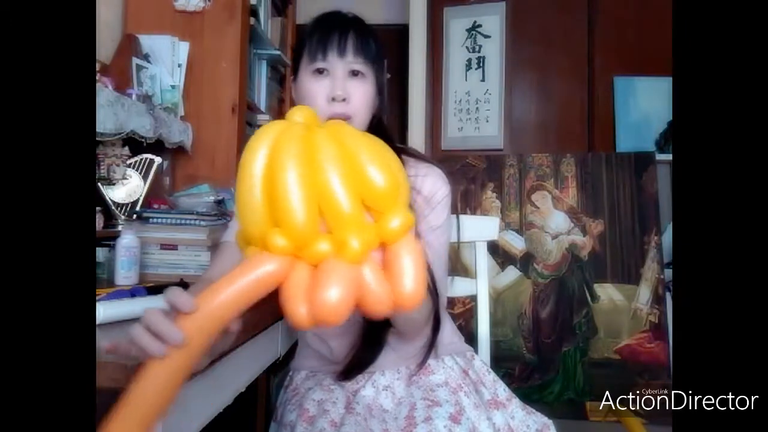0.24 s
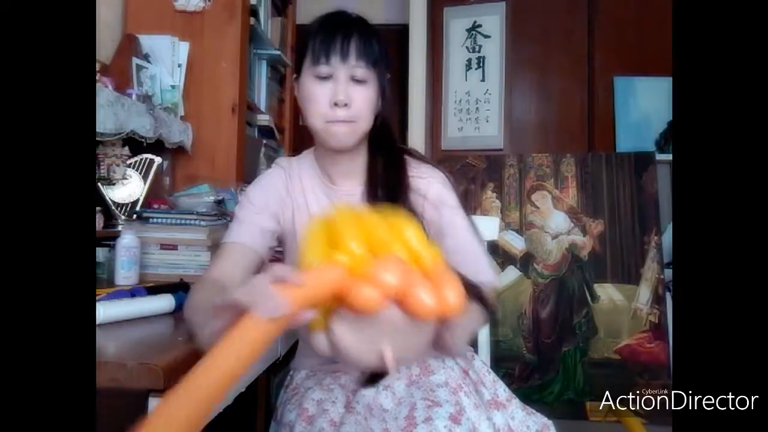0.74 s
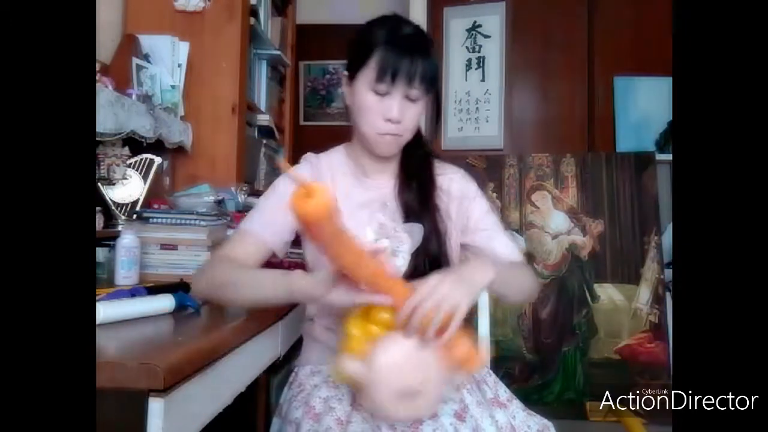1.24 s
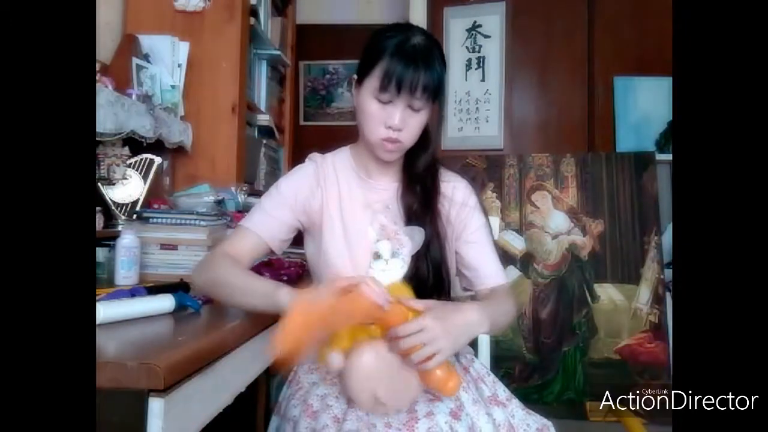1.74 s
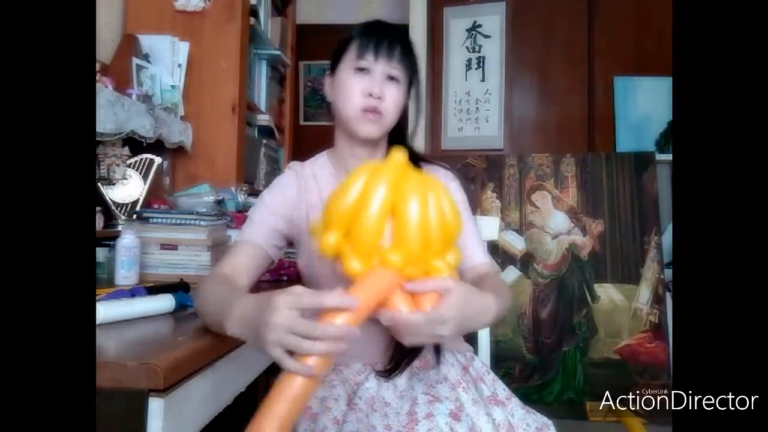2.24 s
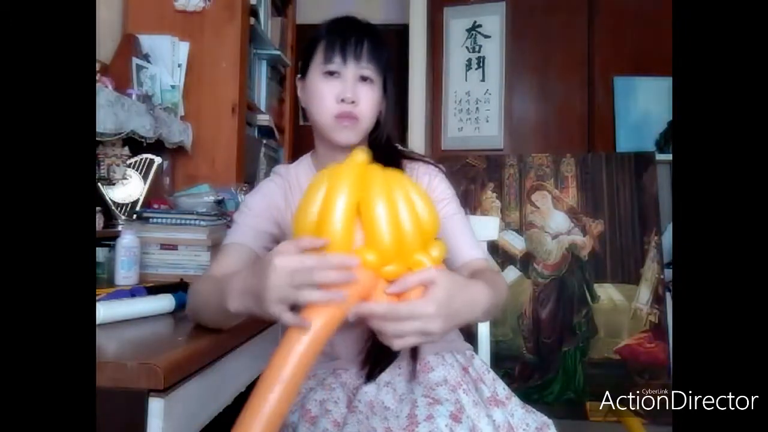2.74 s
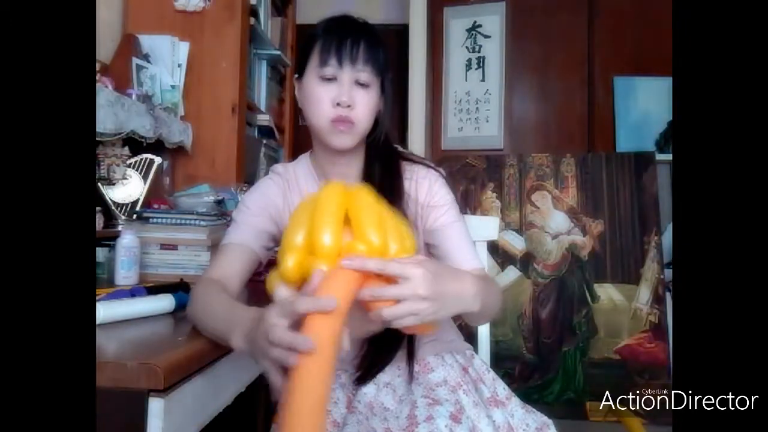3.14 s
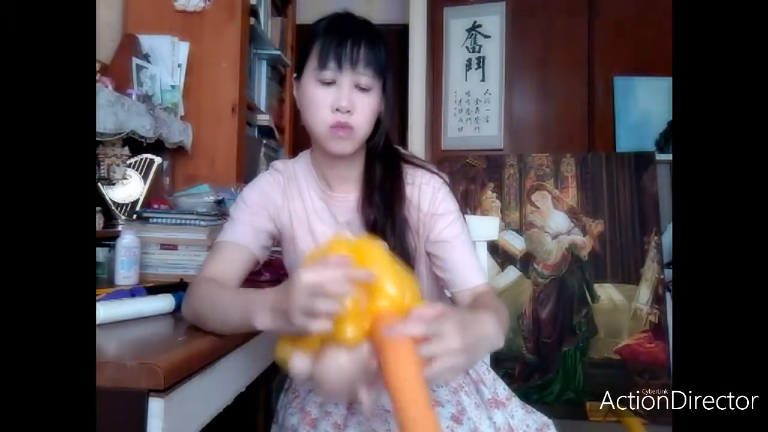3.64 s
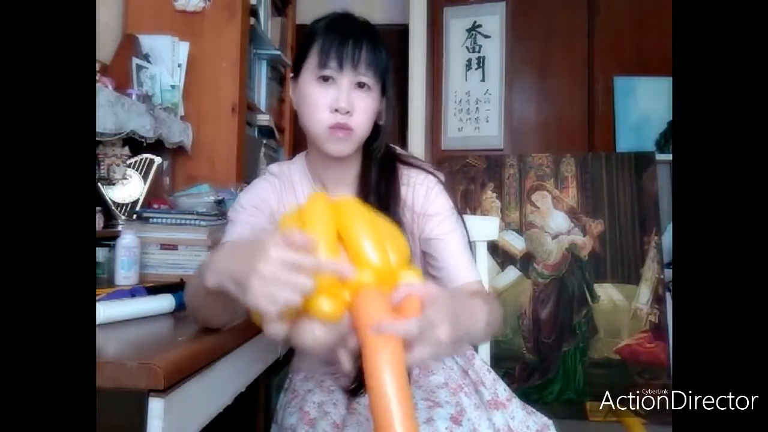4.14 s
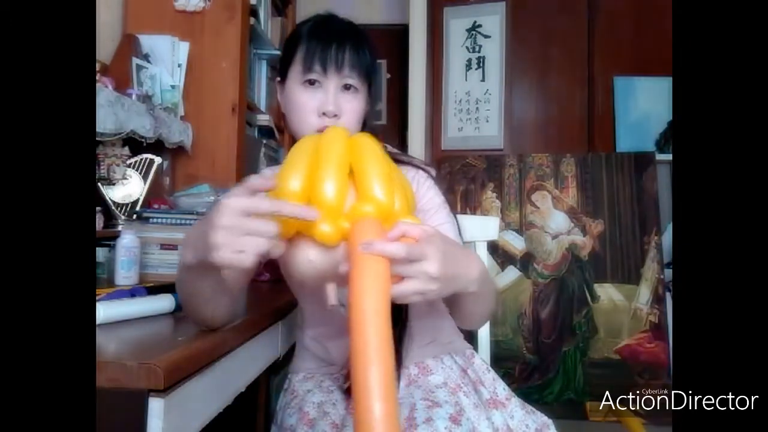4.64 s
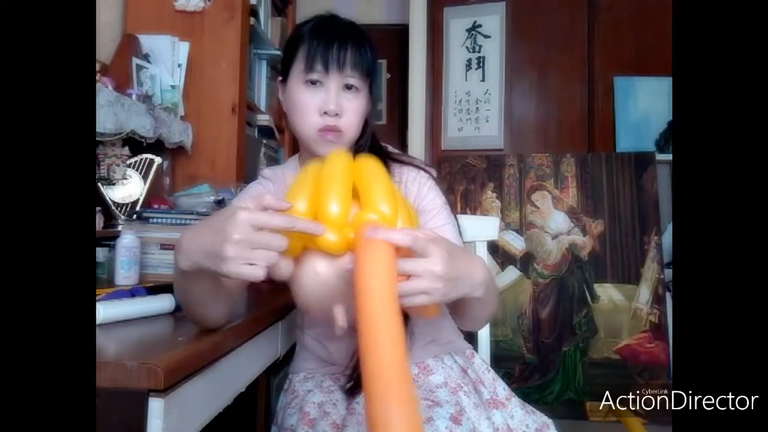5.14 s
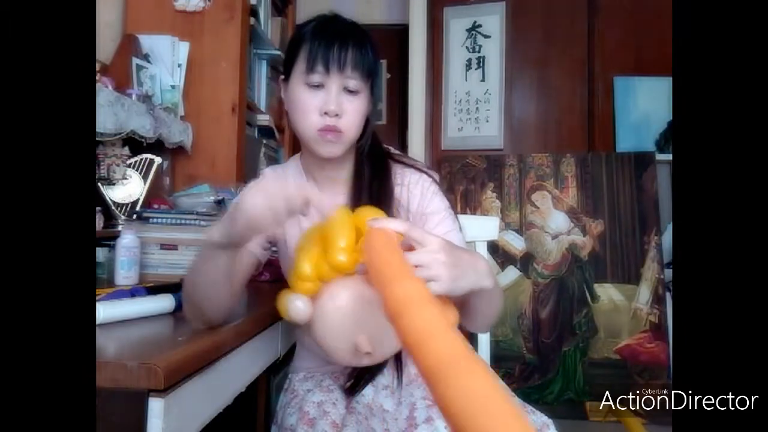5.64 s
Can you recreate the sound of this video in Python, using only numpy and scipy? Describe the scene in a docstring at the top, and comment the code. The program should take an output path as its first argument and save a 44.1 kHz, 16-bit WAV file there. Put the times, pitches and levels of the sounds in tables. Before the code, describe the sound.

In a small room with a steady low hum, hands work a bundle of blown-up modelling balloons. The rubber sticks and slips in scattered ticks, creaks and brief squeaks with a hollow ring, while fingers brush over the skin and the bundle thumps dully. The handling starts gently, builds to a cluster of sharper squeaks and snaps, then pauses before one last clear snap. A single small microphone picks it all up.

```python
"""A small room, where blown-up latex modelling balloons are twisted and woven together by hand.
The rubber skins stick, then slip: one slip snaps, a quick run of slips creaks or squeaks,
and lightly sliding fingers hiss. Every slip makes the balloons ring. The bundle thumps softly
against hands and lap, and one small microphone hears it all over a low hum."""
import sys
import numpy as np
from scipy import signal
from scipy.fft import rfft, irfft
from scipy.io import wavfile
from scipy.ndimage import uniform_filter1d

SR = 44100
rng = np.random.default_rng(int(sys.argv[2]) if len(sys.argv) > 2 else 0)


def master_out(mix):
    """Clip the mix to full scale and print it as 16-bit PCM to the path in sys.argv[1]."""
    frames = np.transpose(np.atleast_2d(mix))
    ceiling = np.clip(frames, -1, 1)
    pcm = np.round(ceiling * 32767).astype(np.int16)
    wavfile.write(sys.argv[1], SR, pcm)


N = 260190
TIME = np.arange(N) / SR

# The skin breaks loose, then drags on:
# (time [s], level [dB], bass [dB], treble [dB], note of the pinched skin [Hz], drag length [s])
SKIN_SNAPS = [(0.625, -54, -4, 3, 3900, .025), (0.776, -55.5, -4, 1, 3900, 0.091),
              (1.443, -51.5, -7, 5, 2570, 0.12), (1.664, -46, 6, 3.5, 1570, 0.081),
              (1.740, -55.5, 7, 15, 610, 0.022), (1.879, -50.5, -10, 10, 3680, .03),
              (2.202, -49.5, -10, -5, 960, 0.012), (2.252, -59, -3, -1, 580, .01),
              (2.476, -63.5, 3, -1, 6990, 0.0088), (2.523, -63.5, 2, 2, 3560, .005),
              (2.558, -55, 1, 4, 1630, .015), (2.821, -51, 7.5, 9, 1590, 0.042),
              (2.890, -56.5, 7, 8, 2380, 0.026), (3.231, -54.5, -10, 14, 2780, 0.013),
              (3.590, -45, 3.5, -1, 1520, 0.063), (3.732, -55.5, -9, -17, 2260, 0.008),
              (3.844, -48.5, 1, -0.5, 2250, 0.016), (3.943, -49, -1, -0.5, 4200, .015),
              (3.976, -45.5, 3, 3, 2070, 0.0048), (4.006, -36.5, -0.5, 0, 670, 0.0082),
              (4.114, -34.5, -2, 7, 4200, 0.024), (4.139, -40.5, -1, -2, 673, 0.057),
              (4.298, -41, 5.5, -2, 1300, 0.074), (4.415, -45.5, -6, -3.5, 1190, 0.0125),
              (4.479, -51.5, 4, -3, 4340, 0.0076), (4.550, -48.5, 1.5, 0, 6460, .03),
              (4.687, -40.5, -4.5, -5.5, 1120, 0.015), (4.74, -41, -4, -3, 1330, 0.025),
              (5.229, -48.5, -3.5, -5.5, 1060, 0.021), (5.248, -46, -3.5, -5.5, 1330, 0.046),
              (5.322, -45.5, 0.5, 3.5, 5980, 0.0075), (5.532, -50, -26, -4, 1400, 0.015),
              (5.547, -33.5, -14.5, -1.5, 915, 0.02)]
# Twists that squeak or creak: (time [s], length [s], slip rate [Hz], unevenness [0-1],
# level [dB], bass [dB], treble [dB], note of the pinched skin [Hz])
TWISTS = [(1.393, 0.05, 902, 0.56, -65.5, -9, 8, 2390), (1.691, .09, 627.6, 0.11, -60, 11, -1, 638),
          (1.855, 0.047, 700, 0.58, -59.5, 1, 23, 4000), (2.685, 0.033, 902, 0.21, -52, -11, 9, 6960),
          (2.733, 0.026, 907, 0.31, -53, 7, 10, 3600), (2.819, .018, 347.5, .05, -55, 17, -1, 340),
          (3.109, 0.075, 904, 0.51, -60.5, -30, 6, 4200), (3.270, 0.088, 449, 0.49, -56.5, -10, -5.5, 2330),
          (3.355, 0.062, 558, 0.18, -42, -6, -5, 4900), (3.415, 0.058, 450, 0.51, -51.5, 1, 0, 3120),
          (3.445, 0.058, 378.2, 0.1, -44.5, -0.5, -5, 750), (4.184, .085, 140.8, 0.04, -36, 1.5, -1.5, 915),
          (4.226, 0.042, 404.7, .15, -45, 5.5, 3, 417), (4.446, 0.02, 800, 0.06, -48.5, -4, 2, 2450),
          (4.643, 0.032, 646.4, 0.02, -41, 0.5, 0.5, 1400), (5.857, 0.065, 497, 0.3, -61.5, 2, -5, 3440)]
# Notes at which the air in the balloons rings: (pitch [Hz], strength [dB], time to fade by 60 dB [s])
AIR_NOTES = [(248.5, -7, 0.48), (349.7, 5.5, 0.11), (417.5, -3.5, 0.29), (577, -1.5, 0.37), (878, -3, 0.28),
             (1009, 3, 0.22), (1376, 0.5, 0.19), (1571, 2.5, 0.14), (1700, -7, 0.25), (1922, -11, 0.25),
             (2324, 2, 0.14), (2500, -11, 0.055), (3440, 4, 0.062), (4665, -1.5, 0.2)]
# Tone of a slip: (frequency [Hz], boost or cut [dB])
SLIP_TONE = [(60, -13), (150, -26.5), (300, -0.5), (550, 2), (1000, -1), (1700, -1), (3000, -2),
             (5300, -5.5), (6200, -3.5), (6900, 0), (7500, -14), (8600, -23.5), (10500, -28), (15000, -29)]
# Fingers glide to a new grip: (start [s], end [s], level [dB])
FINGER_GLIDES = [(0.773, 0.95, -70), (1.346, 1.72, -69.5), (1.79, 2.0, -60), (2.107, 2.26, -60.5),
                 (2.45, 3.04, -66.5), (3.072, 3.538, -62), (3.903, 4.48, -61.5), (4.59, 4.707, -65)]
# Tone of light sliding: (frequency [Hz], boost or cut [dB])
GLIDE_TONE = [(200, -4), (600, 2), (1200, -5), (2300, 0.5), (3400, -1), (4300, -1.5), (5600, -2.5),
              (6900, 4), (7700, -6), (9000, -17), (15000, -14.5)]
# The bundle bumps against hands and lap: (time [s], hollow knock [dB], deep rumble [dB])
BUNDLE_BUMPS = [(.21, -67, -55.5), (.85, -67, -70), (1.182, -57.5, -59), (1.32, -61, -64), (1.57, -60, -72),
                (1.79, -69.5, -61), (2.92, -68, -58), (3.11, -57.5, -64), (3.451, -73, -63),
                (3.99, -52, -67), (4.18, -52, -68), (4.47, -66, -58), (4.75, -55.5, -72), (4.88, -61, -81)]
# Tone of a soft knock on the bundle: (frequency [Hz], boost or cut [dB])
KNOCK_TONE = [(60, -20), (130, -8.5), (170, -5.5), (230, 4), (310, -9), (600, -15.5), (2000, -45.5)]
# Tone of arms and lap moving under it: (frequency [Hz], boost or cut [dB])
RUMBLE_TONE = [(35, -16.5), (65, -0.5), (100, -3.5), (140, -4.5), (250, -23), (800, -63.5)]
# Tone of the still room: (frequency [Hz], boost or cut [dB])
ROOM_TONE = [(18, -19), (30, 0.5), (43, -1.5), (81, -4), (237, -4), (379, -14.5), (479, -13.5),
             (546, -18.5), (622, -8.5), (728, -10.5), (921, -11), (1550, -22), (6890, -34), (9190, -37),
             (15500, -34)]
# The room's hum: (pitch [Hz], level [dB])
HUM_NOTES = [(48.3, -71.5), (99.8, -70.5), (481, -79)]


def snaps(slip_hz=430, uneven=.33, creep_s=0.013, drag_delay_s=0.003):
    """The skin creeps, jumps, then drags on and fades; a harder jump sounds crisper."""
    out = np.zeros(N)
    rising, fading = [(0, 0), (1, 10)], [(0, 0), (1, -10.5)]
    for start, db, bass_db, treble_db, skin_hz, length in SKIN_SNAPS:
        tone = bass_db, treble_db, skin_hz
        creep = drag(creep_s, slip_hz, uneven, rising, db - 21, *tone, fizz_db=-2)
        add(out, start - creep_s, creep)
        crisp_db = 3 + 0.15 * max(db + 46, -4)
        add(out, start, single_slip(db, *tone, fizz_db=crisp_db))
        tail = drag(length, slip_hz, uneven, fading, db - 6, *tone, fizz_db=-2)
        add(out, start + drag_delay_s, tail)
    return out


def single_slip(db, bass_db, treble_db, skin_hz, fizz_db):
    """Stretched rubber lets go in one jump."""
    ring = balloon_ring(crack_db=-2.5, skin_db=-3, ring_db=2.5, notes_db=-9.5, room_db=-12)
    ring = colour(ring, SLIP_TONE, bass_db, treble_db, skin_hz, fizz_db, peak_db=10)
    return set_level(ring, db, samples=int(.02 * SR))


def squeaks(chatter_hz=562.5, chatter_uneven=.4, chatter_db=-7, fizz_db=3.5):
    """A twist breaks the grip, swells and eases off; a second touching spot chatters along."""
    out = np.zeros(N)
    force = [(0, -2), (0.033, -6), (0.48, 0), (1, -6)]
    for start, length, slip_hz, uneven, db, bass_db, treble_db, skin_hz in TWISTS:
        tone = bass_db, treble_db, skin_hz, fizz_db
        add(out, start, drag(length, slip_hz, uneven, force, db, *tone))
        add(out, start, drag(length, chatter_hz, chatter_uneven, force, db + chatter_db, *tone))
    return out


def drag(length, slip_hz, uneven, force, db, bass_db, treble_db, skin_hz, fizz_db, speed_up=.06):
    """Skin rubs on skin in a run of slips. Force points: (share of the length [0-1], push [dB])."""
    length = max(length, 1 / slip_hz)
    waits, sizes = rng.standard_normal((2, 400))
    progress = np.minimum(np.arange(len(waits)) / (slip_hz * length), 1)
    gaps = np.exp(uneven * waits - speed_up * (progress - .5)) / slip_hz
    times = np.cumsum(gaps) - gaps[0]
    times = times[times < length]
    force_db = np.interp(times / length, *np.transpose(force))
    scatter_db = 3 * np.sqrt(uneven) * sizes[:len(times)]
    slips = np.zeros(int(length * SR) + 1)
    np.add.at(slips, (times * SR).astype(int), amp(force_db + scatter_db))
    # the touching spot moves, so one ring blends into another
    travel = np.linspace(0, np.pi / 2, len(slips))
    rub = 0
    for share in np.cos(travel), np.sin(travel):
        ring = balloon_ring(crack_db=-3.5, skin_db=-6.5, ring_db=-1.5, notes_db=-18, room_db=-12.5,
                            skin_fade_s=0.017, ring_fade_s=0.11)
        rub = rub + signal.fftconvolve(slips * share, ring)
    rub = colour(rub, SLIP_TONE, bass_db, treble_db, skin_hz, fizz_db, peak_db=8)
    return set_level(rub, db, samples=len(slips))


def balloon_ring(crack_db, skin_db, ring_db, notes_db, room_db, skin_fade_s=0.019, ring_fade_s=0.12):
    """One slip sets off a crack, waves round the skin, blurred and clear air notes, and room echo."""
    size = 10000
    t = np.arange(size) / SR
    fade = lambda seconds: 1000 ** (-t / seconds)  # 60 dB down after this time
    skin, blur, echo = rng.standard_normal((3, size))
    # the rubber spreads the crack: highs arrive first, lows a moment later
    delay_s = 0.000698 / (1 + np.fft.rfftfreq(size, 1 / SR) / 6000)
    crack = irfft(np.exp(-2j * np.pi * np.cumsum(delay_s) * SR / size)) * fade(ring_fade_s)
    notes = 0
    for hz, db, fade_s in AIR_NOTES:
        strength = amp(db) * rng.uniform(-1.18, 1)  # each spot wakes its own mix of notes
        pitch = hz * (1 + 0.0052 * rng.standard_normal())
        notes = notes + strength * np.sin(2 * np.pi * pitch * t) * fade(fade_s)
    rubber = amp(crack_db) * crack + amp(skin_db) * unit(skin * fade(skin_fade_s))
    air = amp(ring_db) * unit(blur * fade(ring_fade_s)) + amp(notes_db) * unit(notes)
    echo = unit(echo * fade(0.35) * np.minimum(t / 0.014, 1))
    return rubber + air + amp(room_db) * echo


def sliding_fingers(fingers=3, slips_per_s=300, resting_db=-82.5):
    """Countless tiny slips blend into a hiss; the pressure shifts from finger to finger."""
    hiss = 0
    for _ in range(fingers):
        sizes = amp(np.minimum(5.5 * rng.exponential(size=N), 19))
        slips = (rng.random(N) < slips_per_s / SR) * sizes * np.sign(noise())
        pressure = amp(4 * np.tanh(drift(17)))
        ring = balloon_ring(crack_db=-4, skin_db=-1.5, ring_db=-1, notes_db=-12.5, room_db=-12)
        hiss = hiss + signal.oaconvolve(slips * pressure, ring)[:N]
    hiss = colour(hiss, GLIDE_TONE)
    volume = amp(resting_db)  # even a resting grip creeps a little
    for start, end, db in FINGER_GLIDES:
        volume = np.maximum(volume, amp(db) * swell(start, end, rise_s=0.09, fall_s=0.061))
    return hiss / hiss.std() * volume * amp(3 * drift(35))


def jostling(work_starts_s=0.814, rise_s=0.021, fall_s=0.086):
    """The bundle bumps dully against hands and lap, and stirs steadily once the work begins."""
    times, knock_db, rumble_db = np.transpose(BUNDLE_BUMPS)
    bumps = np.array([swell(time, time, rise_s, fall_s) for time in times])
    working = swell(work_starts_s, TIME[-1], rise_s, fall_s)
    out = 0
    for tone, bump_db, steady_db in (KNOCK_TONE, knock_db, -65), (RUMBLE_TONE, rumble_db, -74.5):
        dull = colour(noise(), tone)
        volume = np.hypot(amp(bump_db) @ bumps, amp(steady_db) * working)
        out = out + dull / dull.std() * volume * amp(1.5 * drift(22.05))
    return out


def room(air_db=-63.5):
    """Steady air noise and a slightly wavering hum."""
    air = colour(noise(), ROOM_TONE, size=8192)
    hum = 0
    for hz, db in HUM_NOTES:
        volume = np.sqrt(2) * amp(db + 1.85 * drift(3.93))
        hum = hum + volume * np.sin(2 * np.pi * hz * TIME + 0.94 * drift(3.13))
    return air / air.std() * amp(air_db) + hum


def colour(x, tone, bass_db=0, treble_db=0, peak_hz=1000, fizz_db=0, peak_db=0, size=2048):
    """Shape x with a tone table; adjust the bass, treble, fizz (the very top) and one narrow peak."""
    log_hz = np.log(np.maximum(np.fft.rfftfreq(size, 1 / SR), 1))
    hz, db = np.transpose(tone)
    gain_db = np.interp(log_hz, np.log(hz), db)
    gain_db += np.interp(log_hz, np.log([450, 1800, 6000]), [bass_db, 0, treble_db])
    gain_db += np.interp(log_hz, np.log([8000, 12000]), [0, fizz_db])
    gain_db += peak_db / (1 + ((log_hz - np.log(peak_hz)) / 0.042) ** 2)
    # build the filter so that it rings only after a sound, never before
    folded = irfft(np.log(amp(gain_db)))
    folded[1:size // 2] *= 2
    folded[size // 2 + 1:] = 0
    return signal.fftconvolve(x, irfft(np.exp(rfft(folded))))[:len(x)]


def swell(start, end, rise_s, fall_s):
    """A volume that rises to 1 at start, holds until end and dies away."""
    return np.exp(np.minimum(TIME - start, 0) / rise_s - np.maximum(TIME - end, 0) / fall_s)


def drift(turns_per_s):
    """A smooth random wobble, typically about 1 in size."""
    step = int(SR / turns_per_s)
    wobble = uniform_filter1d(np.repeat(rng.standard_normal(N // step + 1), step), step)[:N]
    return wobble / wobble.std()


def noise():
    """White noise for the whole scene."""
    return rng.standard_normal(N)


def amp(db):
    """Turn decibels into a multiplier."""
    return 10 ** (np.asarray(db) / 20)


def unit(x):
    """Scale x to a total energy of 1."""
    return x / np.sqrt(np.sum(x ** 2) + 1e-18)


def set_level(x, db, samples):
    """Scale x so that its opening samples have the average level db."""
    return x * amp(db) / np.sqrt(np.mean(x[:samples] ** 2))


def add(out, start_s, x):
    """Mix x into out at the given time."""
    i = max(int(start_s * SR), 0)
    out[i:i + len(x)] += x[:max(N - i, 0)]


def scene():
    """All the sounds meet at one microphone."""
    return (snaps() + squeaks() + sliding_fingers() + jostling() + room())[None]


def record(dry, lowest_hz=41, highest_hz=15900):
    """The recorder cuts the deepest bass and the highest treble."""
    dry = signal.sosfilt(signal.butter(12, lowest_hz, "high", fs=SR, output="sos"), dry)
    return signal.sosfilt(signal.ellip(10, .2, 70, highest_hz, fs=SR, output="sos"), dry)


dry = scene()
out = record(dry)
master_out(out)
```